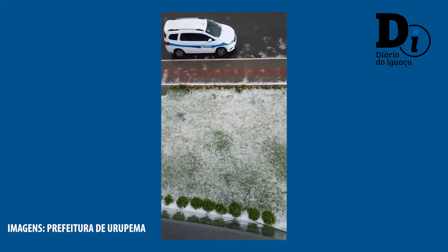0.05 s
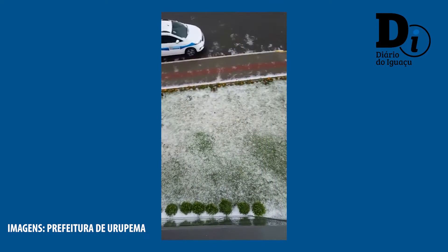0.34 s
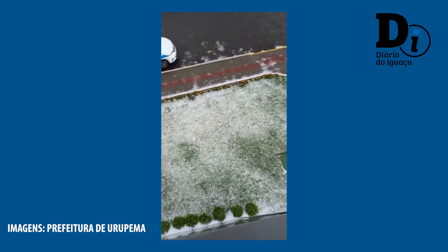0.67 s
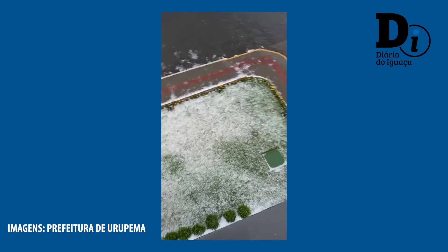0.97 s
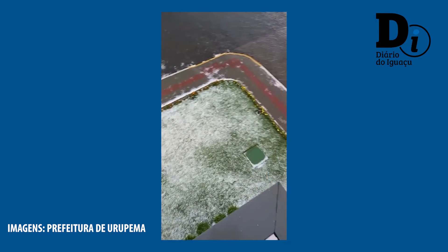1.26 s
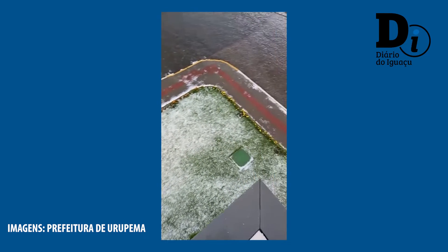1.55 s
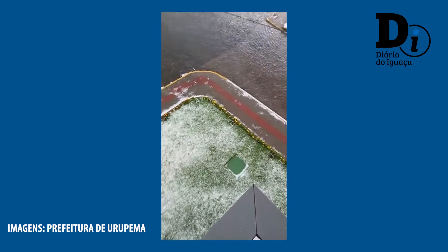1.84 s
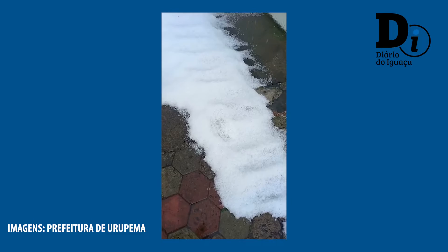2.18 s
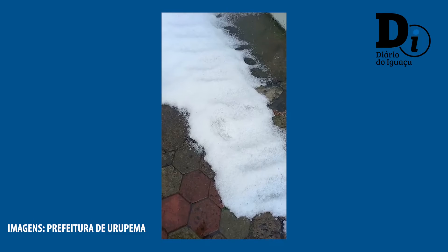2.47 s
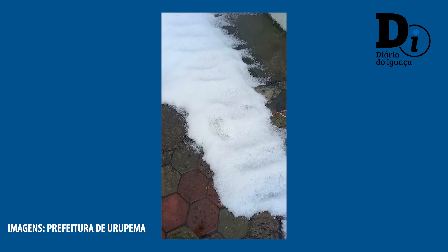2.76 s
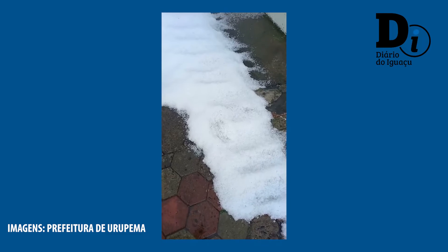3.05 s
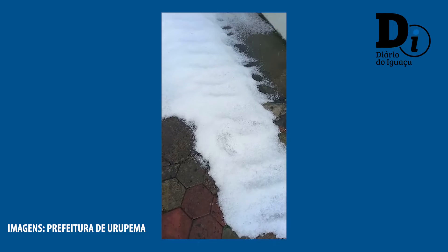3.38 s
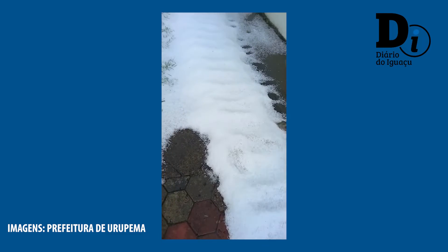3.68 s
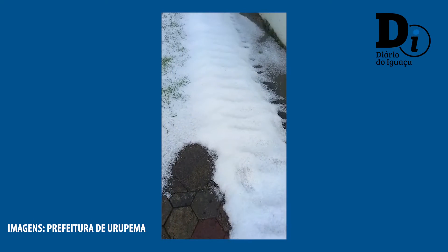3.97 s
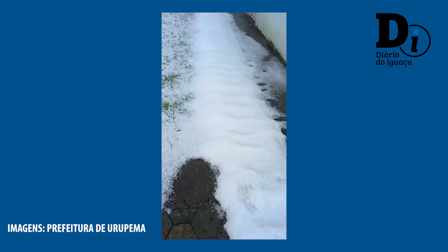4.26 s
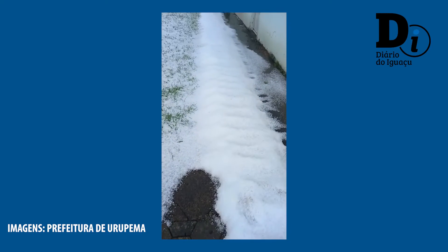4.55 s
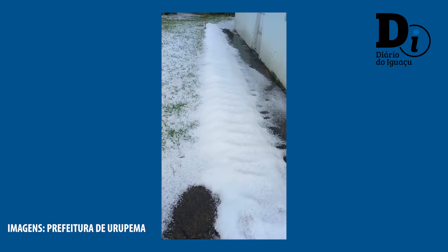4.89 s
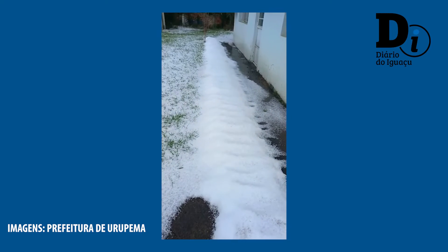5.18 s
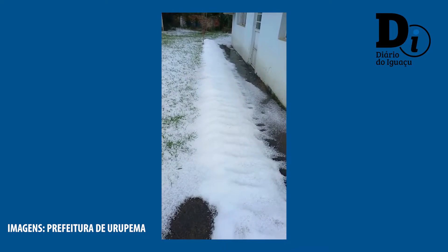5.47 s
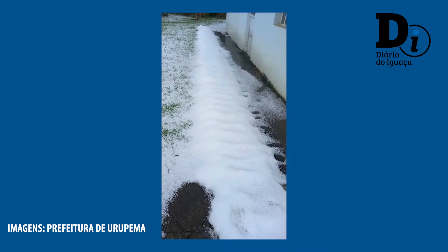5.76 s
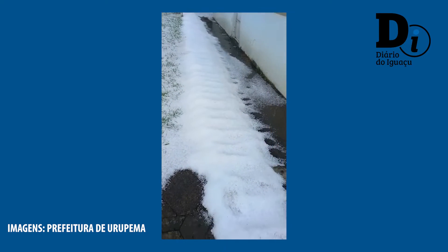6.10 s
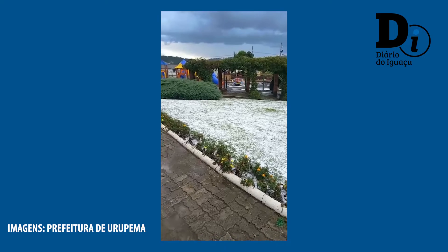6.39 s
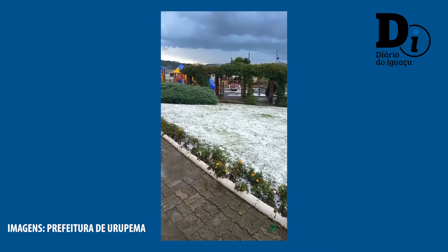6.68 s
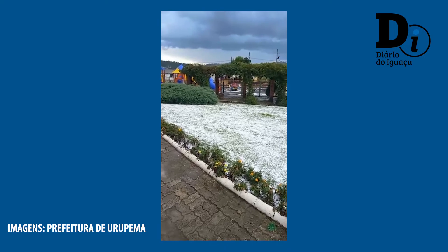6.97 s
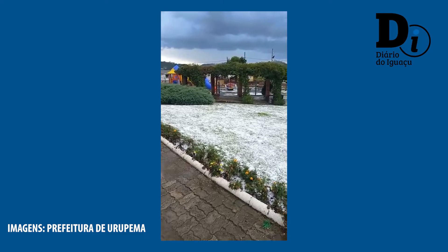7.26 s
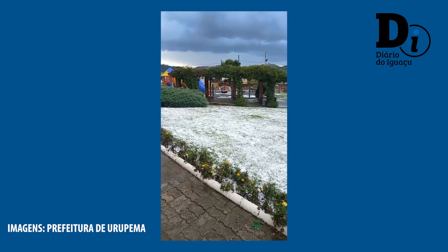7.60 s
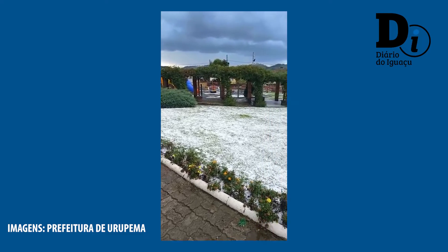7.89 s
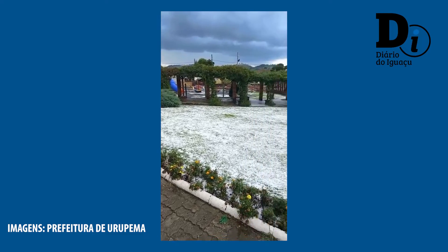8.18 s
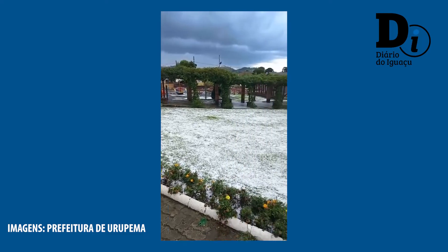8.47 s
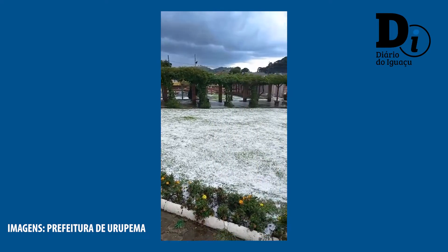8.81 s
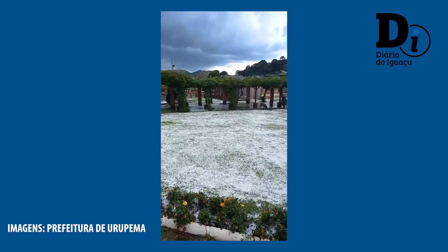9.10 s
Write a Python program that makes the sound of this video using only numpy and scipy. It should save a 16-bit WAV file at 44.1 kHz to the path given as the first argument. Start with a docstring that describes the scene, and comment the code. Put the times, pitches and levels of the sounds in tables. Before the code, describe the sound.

A car passes faintly on a wet street, with a few little splashes and a sharp tap on the microphone case. The sound cuts to fine rain and irregular near drips slapping on paving, with low wind buffets growing stronger. Another cut leads to a quiet park with far traffic on wet roads, where dull handling bumps and a brief finger swish sound on the right.

```python
"""Three spots after a hailstorm

Heard at the two microphone ports of a hand-held case, joined by hard cuts. Above a wet street: faint wash,
splashes, one sharp knock. By a wall: wind buffets the ports, light rain fizzes, meltwater drips on paving.
In a park: far tyres and a breeze, while a finger covers and bumps the right port, then slides off."""
import sys
import numpy as np
from scipy import signal
from scipy.fft import rfft, irfft
from scipy.io import wavfile
from scipy.ndimage import uniform_filter1d

SR = 44100
rng = np.random.default_rng(int(sys.argv[2]) if len(sys.argv) > 2 else 0)


def master_out(mix):
    """Clip the mix to full scale and print it as 16-bit PCM to the path in sys.argv[1]."""
    frames = np.transpose(np.atleast_2d(mix))
    ceiling = np.clip(frames, -1, 1)
    pcm = np.round(ceiling * 32767).astype(np.int16)
    wavfile.write(sys.argv[1], SR, pcm)


N = 403074
TIME_S = np.arange(N) / SR

STREET_S, WALL_S, PARK_S = (0, 2.203), (2.281, 6.222), (6.284, 9.2)
STREET_BREEZE_DB, WALL_BREEZE_DB, PARK_BREEZE_DB = -58.5, -34, -45.5
LIFT_S = 7.565  # finger leaves the right port
GAP_SHUT_HZ, GAP_OPEN_HZ, GAP_OPENING_S = 3100, 6700, 0.085
SWISH_DB, SWISH_RISE_S, RASP_DB, RASP_RISE_S = -47.5, 0.1, -38.5, 0.045
PORT_HZ, PORT_WIDTH_HZ, PORT_RING_GAIN = 6620, 640, 2.86
RAIN_DB, RAIN_FADE_DB_PER_S = -39, 0.45
WASH_DB, ROAR_DB, HISS_DB, ROAR_FADE_IN_S = -51, -55, -53.5, 0.068
DIP_S, DIP_WIDTH_S, DIP_DB = 1.212, 0.025, -18

# Gusts over the breeze; deep buffets (time [s], half-width [s], gain [dB])
GUSTS = [(.62, 0.03, -37.5), (.79, 0.025, -47), (1.18, 0.13, -48.5), (3.635, 0.068, -26),
         (3.95, 0.57, -34.5), (4.21, 0.039, -29), (4.48, 0.063, -26.5), (4.88, 0.03, -27.5),
         (5.05, 0.27, -27.5), (5.315, 0.035, -20.5), (5.415, 0.035, -24), (5.61, 0.039, -20.5),
         (5.75, 0.17, -21.5), (6.765, 0.017, -44), (7.07, 0.05, -44), (7.38, 0.014, -44),
         (7.53, 0.022, -43), (7.815, 0.033, -37.5), (7.94, 0.043, -42.5), (8.97, 0.044, -43),
         (9.12, 0.053, -39)]
BUFFETS = [(3.495, 0.019, -24), (3.605, 0.029, -21), (4.485, 0.045, -17.5), (5.32, 0.036, -22.5),
           (5.615, 0.019, -36)]
# Wind spectra (frequency [Hz], level [dB])
BREEZE_SPECTRUM = [(15, -56), (28, -55), (45, -29), (65, 14), (115, -0.5), (175, -11.5), (230, -3.5),
                   (330, -17.5), (500, -29), (1200, -59)]
RUMBLE_SPECTRUM = [(25, -44), (40, -23), (60, 5.5), (90, 5), (122, 8), (150, 2.5), (185, -3.5), (240, -7.5),
                   (330, -16.5), (500, -24.5), (1200, -64)]
BUFFET_SPECTRUM = [(25, -33), (40, -20), (58, 0.5), (78, 0), (110, -15), (400, -31.5), (1200, -75)]
EDDY_SPECTRUM = [(100, -12.5), (185, -5.5), (242, 4.5), (280, -2.5), (321, -0.5), (385, -8), (470, -13),
                 (540, -25), (680, -27.5), (900, -73)]
RUSH_SPECTRUM = [(250, -52), (480, 10), (650, 10), (850, -2.5), (1500, -42)]
# Fast eddies; rush round the case, both on top of the gust envelope (time [s], gain [dB])
EDDY_GAIN = [(3.1, -7.5), (3.62, 5), (4.05, 4.5), (4.25, -4), (4.48, 1), (4.9, -9), (5.3, -2.5), (5.45, -6),
             (5.7, -12), (6.2, -4)]
RUSH_GAIN = [(2.3, -35.5), (3.1, -29), (3.7, -25), (4.43, -26), (4.65, -33), (5.3, -24), (5.65, -28.5),
             (6.2, -34)]

# Soft hand bumps (time [s], gain [dB], nominal pitch [Hz], left share [0-1], scuff [dB])
BUMPS = [(1.269, -23, 100, 0, -25), (6.284, -18, 60, 0, -26), (6.407, -9, 95, 0, -22),
         (6.545, -16, 130, 0, -7), (6.62, -16, 130, 0, -12), (6.838, -13, 130, 0, -2),
         (6.8655, -.5, 86, 0, -4), (6.971, -13, 150, 0, -2), (7.374, -26, 120, 0, -15),
         (7.563, -19, 80, 0, -1), (7.575, -.5, 78, .03, -6.5)]
# Hard taps (time [s], left [dB], right [dB], rebound [0-1], tilt [dB/octave])
TAPS = [(1.2418, 4, -19, .5, 0), (1.3732, -29, -25, 0, 1.5), (1.7552, -28.5, -22, 0, 1.5)]
# Finger strokes (time [s], half-width [s], gain [dB])
STROKES = [(6.525, 0.046, -25.5), (6.64, 0.052, -26), (6.72, 0.4, -34), (7.04, 0.063, -34)]
# Finger on the right port (time [s], seal [0-1])
FINGER_SEAL = [(6.28, 1), (7.565, 1), (7.605, 0)]
# Contact spectra (frequency [Hz], level [dB])
TAP_SPECTRUM = [(60, -45), (230, -20), (370, 3), (850, 1), (1200, -7), (1700, 0), (2100, -8), (2400, -11),
                (3000, -20), (5200, -20), (8000, -33), (15000, -31)]
SCUFF_SPECTRUM = [(40, -8), (340, 2), (540, -12), (900, -9), (1400, -17), (2300, -23), (4500, -40),
                  (9000, -58), (16000, -66)]
RASP_SPECTRUM = [(100, -22), (600, -2), (1800, -8), (4000, -10), (9000, -45)]
# Covered port's response to traffic; to bumps (frequency [Hz], gain [dB])
COVERED_AIR_EQ = [(200, -10), (600, -8), (1000, -1.5), (2200, -10), (2700, -31), (5000, -35), (16000, -43)]
COVERED_BUMP_EQ = [(150, -3.5), (270, 0), (700, -6), (1500, -10), (2300, -17), (6000, -16)]

# Near drips on paving (time [s], gain [dB], ping [Hz], treble [dB])
DRIPS = [(2.313, -27, 4500, 1), (2.396, -31, 6700, 22), (2.456, -38, 6400, -17), (2.612, -28, 6950, 5),
         (2.689, -27, 7000, 20), (2.735, -34, 6360, -3), (2.927, -33, 7000, 20), (3.089, -30, 5200, -7),
         (3.226, -31.5, 5000, -1), (3.249, -22.5, 4870, 3), (3.257, -28, 6420, 13),
         (3.288, -30.5, 5900, 2.5), (3.495, -23, 5200, 0.5), (3.579, -28, 6650, 4), (3.594, -26, 3140, 7),
         (4.068, -38, 4420, -12), (4.128, -18, 9800, 1), (4.243, -31, 12400, 4), (4.257, -27, 4400, -4),
         (4.486, -32.5, 5140, -24), (4.589, -36, 6500, -2), (4.641, -28.5, 5570, 5), (4.659, -29, 7770, 16),
         (4.784, -27.5, 8300, 2.5), (4.806, -32, 6850, 22), (4.893, -31, 8400, 1), (4.932, -32, 5830, -14),
         (4.958, -25.5, 3700, -12), (5.007, -30.5, 5500, -2), (5.018, -26.5, 5400, -2),
         (5.093, -27, 4900, -12), (5.289, -31, 6510, 19), (5.361, -29, 5370, 7), (5.519, -25.5, 5000, -0.5),
         (5.549, -31, 6400, 17), (5.632, -31, 7300, 9), (5.639, -28, 5600, 10), (5.69, -31, 4370, -11),
         (5.714, -27.5, 6000, 4), (5.828, -30.5, 10500, -4), (5.897, -29, 5560, 4.5),
         (6.114, -32, 6000, 22), (6.164, -37, 6400, 2)]
# Street splashes (time [s], gain [dB], t60 [s])
SPLASHES = [(.165, -38, 0.082), (0.177, -34, 0.057), (.361, -42.5, 0.14), (.655, -42, .08),
            (0.673, -36, 0.04), (0.973, -36, 0.013), (1.53, -41, 0.027)]
# Water and wet-road spectra (frequency [Hz], level [dB])
RAIN_SPECTRUM = [(100, 0), (500, 8.5), (900, 8), (1700, 4.5), (2900, 0.6), (5000, -1), (6700, 0.5),
                 (8200, 1), (10600, 1.5), (13000, 4.5), (16000, 0.5)]
SPLASH_SPECTRUM = [(500, 3), (2000, 9.6), (5500, 9.4), (8500, 0.5), (15000, 1)]
WASH_SPECTRUM = [(30, 5), (200, 3.5), (380, 6), (700, 5), (1300, 1), (1900, 2.5), (2800, -3.5), (6500, -9),
                 (8500, -12), (14000, -10), (16000, -12.5)]
ROAR_SPECTRUM = [(100, -5), (430, -10), (750, -3.5), (1000, 0.5), (1400, -4), (2000, -8.5), (4000, -49)]
HISS_SPECTRUM = [(300, -29), (1000, -5.5), (1600, -1), (2200, 2.5), (4000, 0), (6500, -5), (9300, -5.5),
                 (13000, -15.5), (16000, -28)]
# Right port relative to left (frequency [Hz], gain [dB])
RAIN_RIGHT_EQ = [(2000, 0), (3500, 1), (6800, 4.5), (8000, -1), (12000, -3), (16000, -2)]
PARK_RIGHT_EQ = [(400, 4.5), (1000, -2), (2200, 5), (4500, -2.5), (7000, -4), (8200, -16), (12000, -18),
                 (16000, -13)]
# Car driving off in the street (time [s], half-width [s], gain [dB])
STREET_CAR = [(.8, 0.64, -48)]
# Cars far from the park (time [s], half-width [s], roar [dB], wet hiss [dB])
FAR_CARS = [(6.42, 0.33, -59, -43.5), (6.95, 0.25, -57, -48.5), (7.38, 0.57, -57, -76),
            (8.27, 0.1, -58, -55.5), (9.15, 0.22, -50, -53.5)]
# Far hoots (time [s], length [s], pitch [Hz], peak [dB])
HOOTS = [(2.98, .12, 645, -40.5), (5.16, .1, 490, -39)]


def wall_wind():
    """Gusts rumble, buffet and shed eddies at the ports, and rush round the case."""
    wind = swells(GUSTS, WALL_BREEZE_DB)
    rumble = air(RUMBLE_SPECTRUM, 0.93, 680, 0.54, size=4096) * wind
    buffet = air(BUFFET_SPECTRUM, 1.0, 300, 0.7, size=4096) * swells(BUFFETS)
    eddies = air(EDDY_SPECTRUM, 1.0, 434, 1.47, lag_ms=0.035, size=4096)
    eddies *= wind * gain_of(curve(EDDY_GAIN)) * ports(-0.68, 0.28)
    rush = air(RUSH_SPECTRUM, 0.35, 700, 2.1) * wind ** 0.68 * gain_of(curve(RUSH_GAIN))
    return rumble + buffet + eddies + rush


def bumps():
    """The hand bumps the case: knock, falling thud and gritty scuff, muffled while the port is covered."""
    out, t = np.zeros((2, N)), TIME_S[:8192]
    knock = np.roll(click(SCUFF_SPECTRUM, size=len(t)), round(SR / 2000))
    drag = pulse(t / .0055) ** 2 + .17 * decay(t, .15)
    press = 1 - np.exp(-(t / .0007) ** 2)
    for s, db, hz, left_share, scuff_db in BUMPS:
        covered = PARK_S[0] <= s < LIFT_S
        cycles = hz * (.48 * t + .0105 * (1 - np.exp(-t / .008)))
        thud = np.sin(2 * np.pi * cycles) * decay(t, 6.5 / hz)
        grit = rng.standard_normal(len(t)) * flutter(300, 4)[:len(t)]
        slip = .055 if covered else .12
        scuff = slip * unit_rms(colour(grit, SCUFF_SPECTRUM) * drag) - knock
        bump = press * (thud + gain_of(scuff_db) * scuff)
        if covered:
            bump = colour(bump, COVERED_BUMP_EQ)
        add(out, s, gain_of(db) * np.array([[left_share], [1 - left_share]]) * bump)
    return out


def taps():
    """Hard taps click through the case and rattle it; the loudest rebounds."""
    out = np.zeros((2, N))
    for s, left_db, right_db, rebound, tilt_db in TAPS:
        spectrum = [(hz, db + tilt_db * np.log2(hz)) for hz, db in TAP_SPECTRUM]
        tap, gain = click(spectrum), ports(left_db, right_db)
        rattle = unit_rms(colour(rng.standard_normal((2, len(tap))), spectrum))
        add(out, s, gain * (tap + .13 * rattle * decay(TIME_S[:len(tap)], .035)))
        add(out, s + 0.00116, gain * rebound * tap)
    return out


def strokes():
    """A finger rubs the case: low rumble at the right port."""
    return air(BUFFET_SPECTRUM, 0, 100, 0.68, size=4096) * swells(STROKES) * ports(-29, 0)


def finger_slide():
    """Skin rasps and hisses across the right port; two gap resonances rise as it opens."""
    hiss, since_s = rng.standard_normal(N), np.maximum(TIME_S - LIFT_S, 0)
    gap_hz = GAP_OPEN_HZ + (GAP_SHUT_HZ - GAP_OPEN_HZ) * np.exp(-since_s / GAP_OPENING_S)
    low = resonate(resonate(hiss, gap_hz, 2500), gap_hz, 2500)
    high = resonate(resonate(hiss, 2.6 * gap_hz, 4200), 2.6 * gap_hz, 4200)
    swish = unit_rms((low + .5 * high) * flutter(120, 2.5))
    swish *= gain_of(SWISH_DB) * pulse(since_s / SWISH_RISE_S) ** 2.5
    rasp = unit_rms(colour(rng.standard_normal(N), RASP_SPECTRUM) * flutter(250, 3))
    rasp *= gain_of(RASP_DB) * pulse(since_s / RASP_RISE_S) ** 2
    return (swish + rasp) * [[0], [1]]


def drips():
    """Drops slap the paving: ping, spatter and bright tick; the right port rings with each."""
    out, t = np.zeros((2, N)), TIME_S[:2048]
    for s, db, hz, treble_db in DRIPS:
        rise_cycles = .6 + 1 / (1 + gain_of(treble_db + 14))  # duller drops ring longer
        slap = np.sin(2 * np.pi * hz * t) * pulse(t * hz / rise_cycles)
        spatter = signal.lfilter(slap[:64], 1, rng.standard_normal((2, len(t)))) / np.linalg.norm(slap)
        ping = slap + spatter * (.36 * decay(t, .011) + .045 * decay(t, .06))
        tick = np.diff(colour(rng.standard_normal((2, len(t) + 1)), RAIN_SPECTRUM))
        tick *= decay(t, .008) + .1 * decay(t, .04)
        treble = gain_of(treble_db)
        drop = ping * ports(3, 9.65) + treble * tick * gain_of(-0.5)
        drop[1] += PORT_RING_GAIN * resonate(drop[1], np.full(len(t), PORT_HZ), PORT_WIDTH_HZ)
        add(out, s, gain_of(db) * drop / np.sqrt(1 + treble ** 2))
    return out


def pop(s=5.9185, hz=370, peak_db=-11):
    """Dull pop at the left port: one pressure swing, no ring."""
    phase = 2 * np.pi * hz * (TIME_S - s)
    return gain_of(peak_db) * phase * np.exp((1 - phase ** 2) / 2) * [[1], [0]]


def rain():
    """Fine drops fizz and slowly fade over a steady, faint trickle."""
    fizz = air(RAIN_SPECTRUM, 0.08, 1030, 1.9) * flutter(65, 0.41)
    fizz += gain_of(-10) * patter(300, 4.2, 7700, 14300, 0.9)
    fizz[1] = colour(fizz[1], RAIN_RIGHT_EQ)
    fizz *= gain_of(RAIN_DB - RAIN_FADE_DB_PER_S * (TIME_S - WALL_S[0]))
    trickle = gain_of(-53) * patter(70, 2.6, 4800, 7800, 2.8) * ports(-5, 2)
    return fizz + trickle


def splashes():
    """Short bursts of spray in the street."""
    out, t = np.zeros((2, N)), TIME_S[:4096]
    for s, db, t60_s in SPLASHES:
        spray = unit_rms(colour(rng.standard_normal((2, len(t))), SPLASH_SPECTRUM))
        add(out, s, gain_of(db) * spray * decay(t, t60_s))
    return out


def street_wash():
    """Wet wash with fine drops; swells once as a car drives off."""
    wash = air(WASH_SPECTRUM, 0.93, 550, 2.17) + gain_of(-11.5) * patter(400, 6.7, 860, 7600, 0.96)
    return wash * swells(STREET_CAR, WASH_DB)


def street_breeze():
    """Light wind rumbles, mostly on the right port."""
    return air(BREEZE_SPECTRUM, 0.63, 300, 2.8) * swells(GUSTS, STREET_BREEZE_DB) * ports(-16.0, 3.3)


def park_breeze():
    """Light wind rumbles on both ports."""
    return air(BREEZE_SPECTRUM, 0.94, 900, 1.86) * swells(GUSTS, PARK_BREEZE_DB) * ports(0.27, 4.0)


def far_traffic():
    """Tyres roar and hiss on wet roads; the finger muffles the right port until it lifts."""
    roar = air(ROAR_SPECTRUM, 0.74, 3000, 0.89, lag_ms=-0.072) * swells(FAR_CARS, ROAR_DB)
    hiss = air(HISS_SPECTRUM, 0.68, 3200, 1.3, lag_ms=-0.16) * swells(FAR_CARS, HISS_DB, db_column=3)
    left, right = roar * np.clip((TIME_S - PARK_S[0]) / ROAR_FADE_IN_S, 0, 1) + hiss
    right = colour(right, PARK_RIGHT_EQ)
    seal = curve(FINGER_SEAL)
    return np.array([left, seal * colour(right, COVERED_AIR_EQ) + (1 - seal) * right])


def hoots():
    """Faint far tones swell and fade, slightly unsteady in pitch."""
    out = np.zeros(N)
    for s, length_s, hz, db in HOOTS:
        progress = np.clip((TIME_S - s) / length_s, 0, 1)
        cycles = np.cumsum(hz * flutter(90, .18)) / SR
        out += gain_of(db) * np.sin(np.pi * progress) ** 2 * np.sin(2 * np.pi * cycles)
    return out


def air(spectrum, coherence, coherent_below_hz, patchy_db, lag_ms=0, size=1024):
    """Patchy two-port noise, unit RMS; left lags by lag_ms."""
    hz = np.fft.rfftfreq(size, 1 / SR)
    a, b, c, d, patches = rng.standard_normal((5, 4 * N // size + 5, len(hz)))
    patches = unit_rms(uniform_filter1d(uniform_filter1d(patches, size=6, axis=0), size=16, axis=1))
    shared = coherence / (1 + (hz / coherent_below_hz) ** 4)
    left, independent = a + 1j * b, c + 1j * d
    right = shared * left * np.exp(2j * np.pi * hz * lag_ms / 1000)
    right += np.sqrt(1 - shared ** 2) * independent
    frames = np.array([left, right]) * gain_of(db_at(spectrum, hz) + patchy_db * patches)
    _, noise = signal.istft(frames.swapaxes(1, 2), nperseg=size, noverlap=size - size // 4)
    return unit_rms(noise[:, :N])


def patter(per_s, spread_db, low_hz, high_hz, decay_cycles, bands=24):
    """Tiny drops, each a brief ping nearer to one port."""
    out, t = np.zeros((2, N)), TIME_S[:256]
    for k, hz in enumerate(np.geomspace(low_hz, high_hz, bands)):
        at, size, sign = rng.random((3, 2000))[:, :int(per_s * N / SR / bands)]
        hits = np.zeros(N)
        hits[(at * N).astype(int)] = np.sign(sign - .5) * gain_of(spread_db * np.minimum(-np.log(size), 4))
        ping = np.sin(2 * np.pi * hz * t) * np.exp(-t * hz / decay_cycles) * np.sqrt(hz)
        pings = signal.oaconvolve(hits, ping)[:N]
        out[k % 2] += pings
        out[1 - k % 2] += 0.096 * np.roll(pings, k)
    return unit_rms(out)


def click(spectrum, size=2048):
    """Minimum-phase click, peak 1."""
    log_gain = np.log(gain_of(db_at(spectrum, abs(np.fft.fftfreq(size, 1 / SR)))))
    wave = np.fft.ifft(np.exp(np.conj(signal.hilbert(log_gain)))).real
    return wave / abs(wave).max()


def resonate(x, hz, width_hz):
    """Unity-gain resonance tracking the curve hz."""
    carrier, pole = np.exp(2j * np.pi * np.cumsum(hz) / SR), np.exp(-np.pi * width_hz / SR)
    return 2 * (carrier * signal.lfilter([1 - pole], [1, -pole], x / carrier)).real


def colour(x, spectrum):
    size = x.shape[-1]
    return irfft(rfft(x) * gain_of(db_at(spectrum, np.fft.rfftfreq(size, 1 / SR))), size)


def db_at(spectrum, hz):
    knots_hz, db = np.transpose(spectrum)
    return np.interp(np.log(hz + 1), np.log(knots_hz + 1), db)


def swells(rows, steady_db=-np.inf, db_column=2):
    """Gain: bell-shaped swells add power to a steady level."""
    power = sum((gain_of(row[db_column]) * bell(row[0], row[1] * np.sqrt(2))) ** 2 for row in rows)
    return np.sqrt(gain_of(steady_db) ** 2 + power)


def flutter(per_s, depth_db):
    """Randomly wandering gain."""
    return gain_of(depth_db * np.interp(TIME_S * per_s, np.arange(2000), rng.standard_normal(2000)))


def gate(span_s):
    return uniform_filter1d(((TIME_S >= span_s[0]) & (TIME_S < span_s[1])).astype(float), size=128)


def curve(rows):
    return np.interp(TIME_S, *np.transpose(rows))


def bell(s, width_s):
    return np.exp(-((TIME_S - s) / width_s) ** 2)


def pulse(age):
    """Rise and fall, peak 1 at age 1."""
    return age * np.exp(1 - age)


def decay(t, t60_s):
    return np.exp(-np.log(1000) * t / t60_s)


def gain_of(db):
    return 10 ** (np.asarray(db) / 20)


def ports(left_db, right_db):
    return gain_of([[left_db], [right_db]])


def unit_rms(x):
    return x / np.sqrt(np.mean(x ** 2) + 1e-20)


def add(mix, s, sound):
    part = mix[:, round(s * SR):][:, :sound.shape[1]]
    part += sound[:, :part.shape[1]]


def scene():
    """Three spots in turn, plus the hand on the case."""
    street = street_wash() + street_breeze() + splashes()
    wall = rain() + wall_wind() + drips() + hoots() + pop()
    park = far_traffic() + park_breeze() + strokes()
    out = street * gate(STREET_S) + wall * gate(WALL_S) + park * gate(PARK_S)
    out += taps() + bumps() + finger_slide()
    out[0] *= gain_of(DIP_DB * bell(DIP_S, DIP_WIDTH_S))  # left dips just before the sharp knock
    return out


def record(dry, low_hz=36, high_hz=16050, ceiling=1.1):
    """Port bass roll-off, soft clip, steep low-pass."""
    thinned = signal.sosfilt(signal.butter(4, low_hz, "high", fs=SR, output="sos"), dry)
    rounded = thinned / (1 + (thinned / ceiling) ** 6) ** (1 / 6)
    lowpass = signal.firwin(511, high_hz, window=("kaiser", 9), fs=SR)
    return signal.oaconvolve(rounded, lowpass[None], "same")


dry = scene()
out = record(dry)
master_out(out)
```